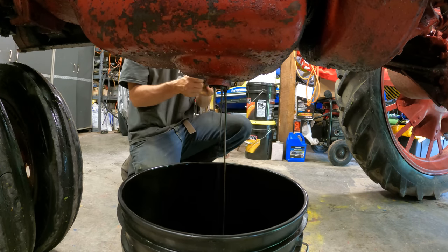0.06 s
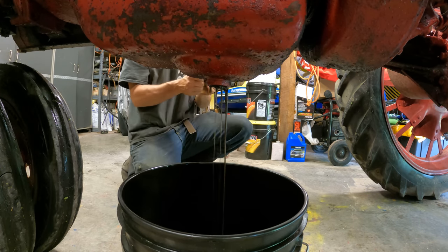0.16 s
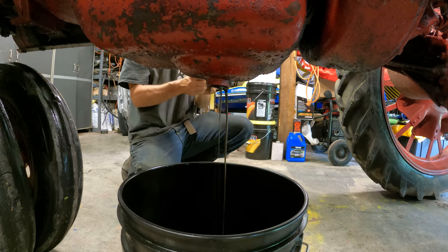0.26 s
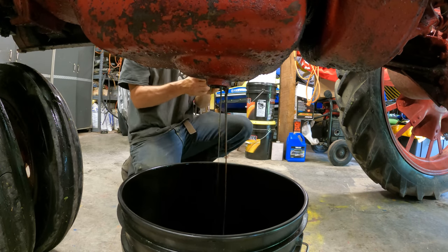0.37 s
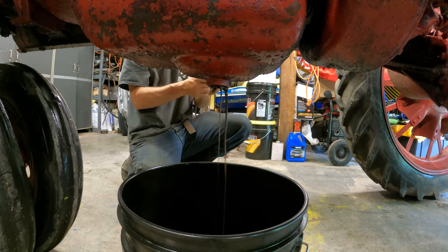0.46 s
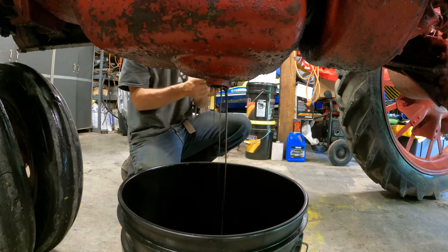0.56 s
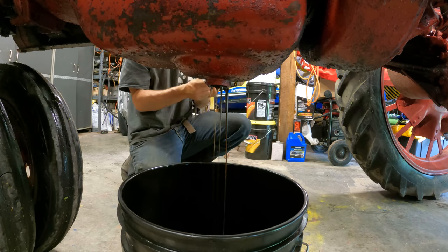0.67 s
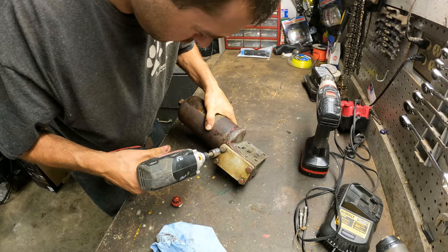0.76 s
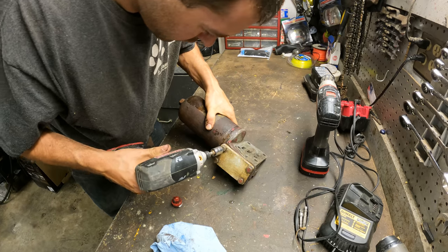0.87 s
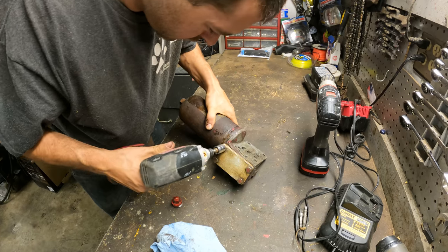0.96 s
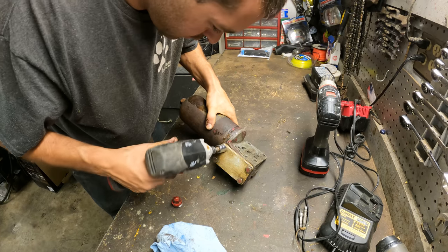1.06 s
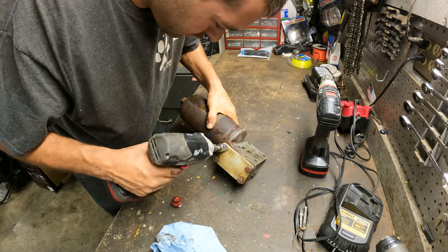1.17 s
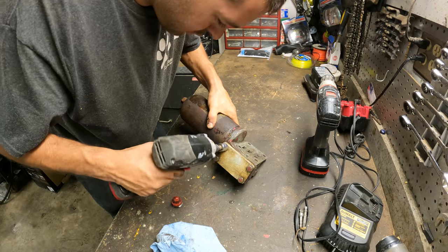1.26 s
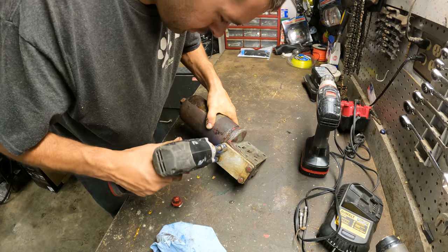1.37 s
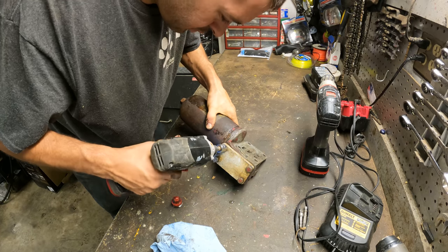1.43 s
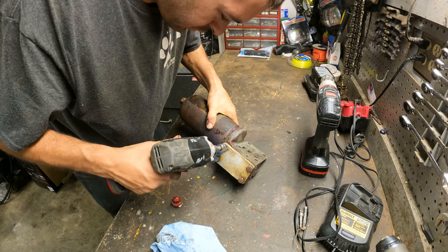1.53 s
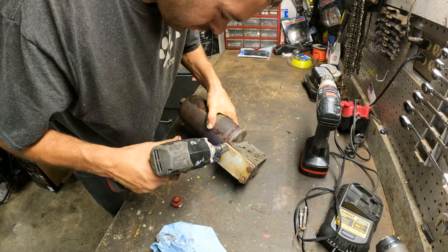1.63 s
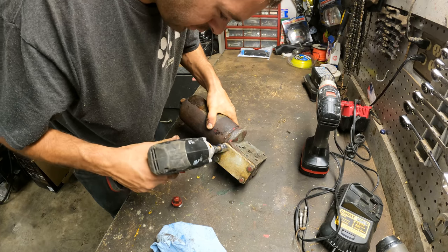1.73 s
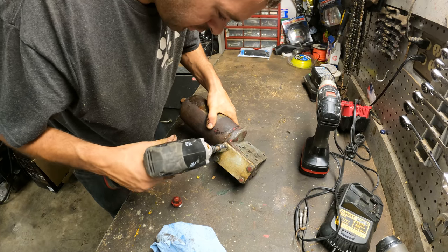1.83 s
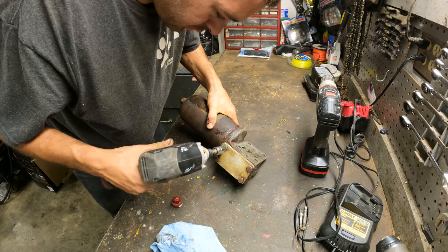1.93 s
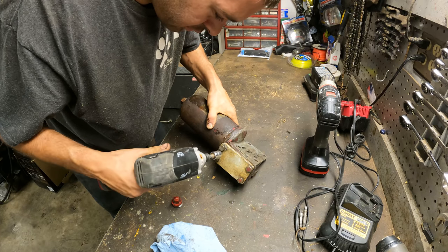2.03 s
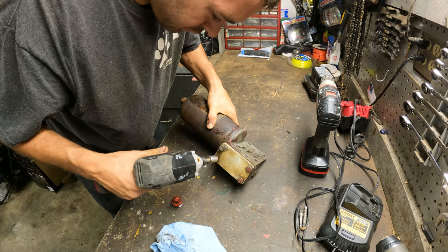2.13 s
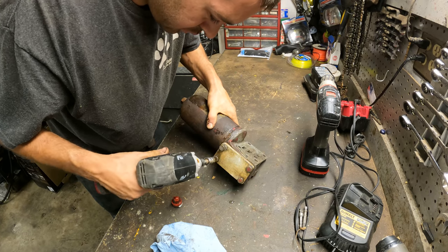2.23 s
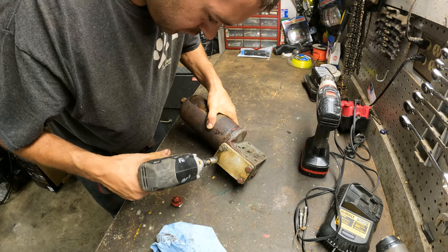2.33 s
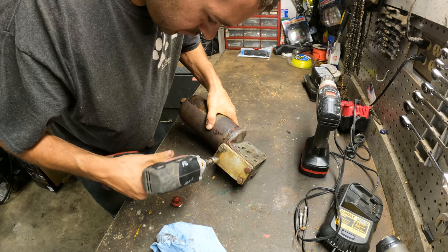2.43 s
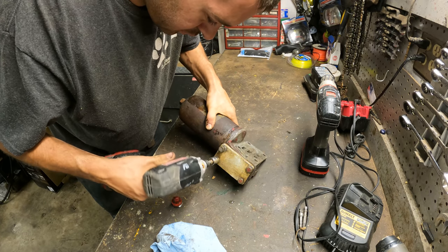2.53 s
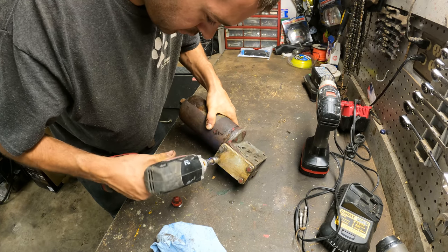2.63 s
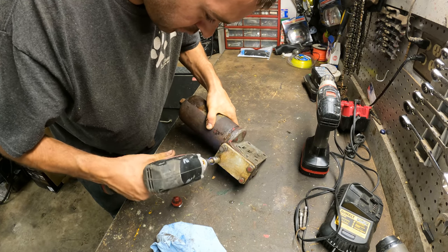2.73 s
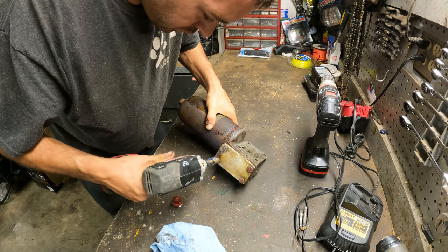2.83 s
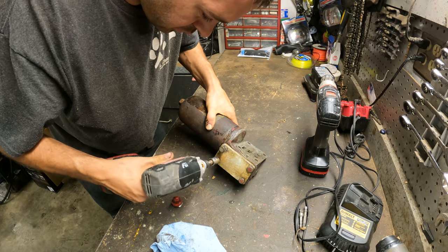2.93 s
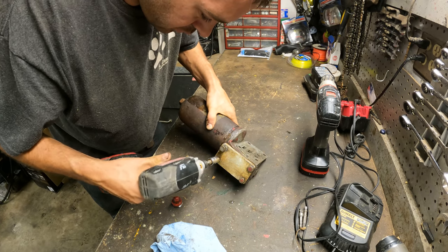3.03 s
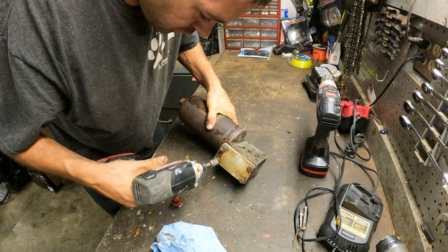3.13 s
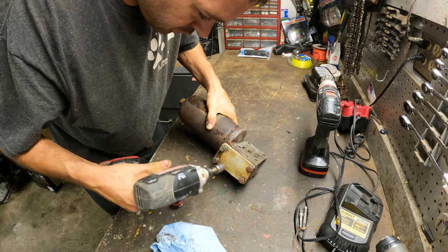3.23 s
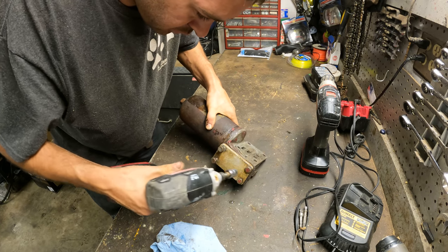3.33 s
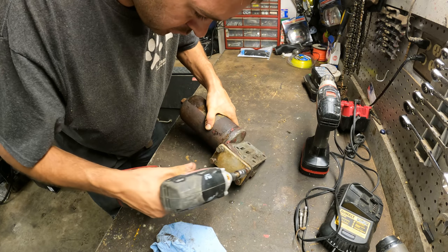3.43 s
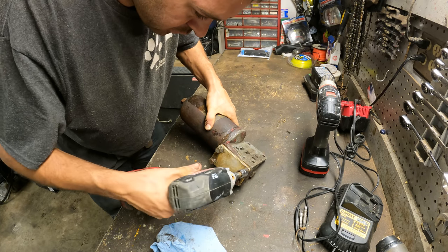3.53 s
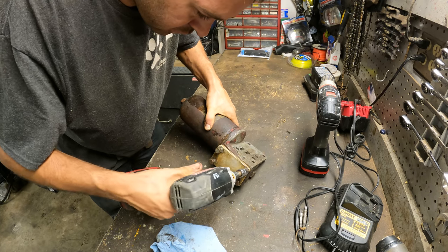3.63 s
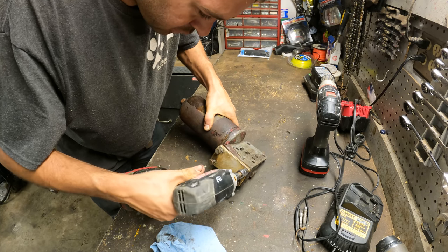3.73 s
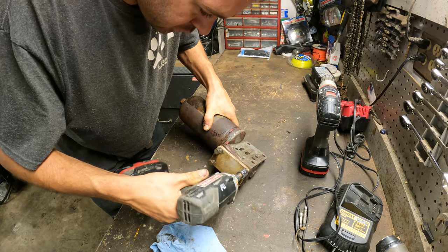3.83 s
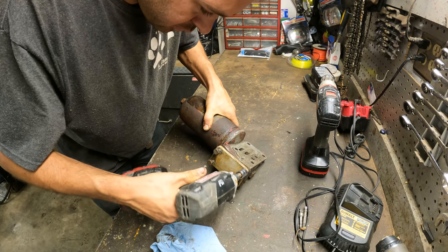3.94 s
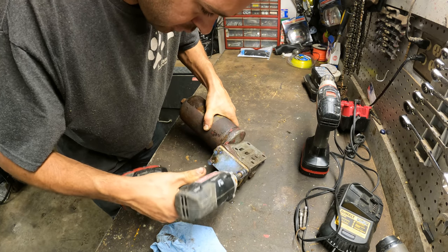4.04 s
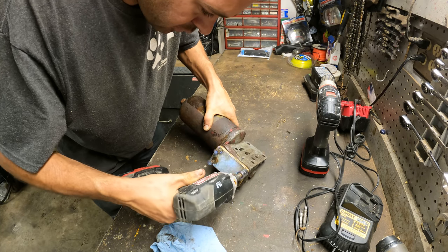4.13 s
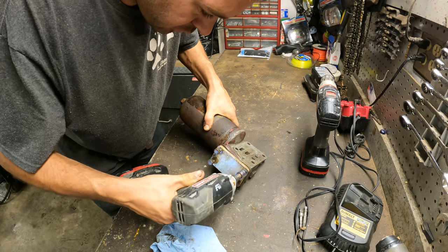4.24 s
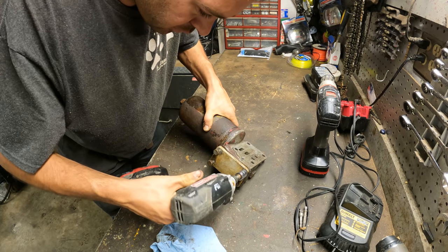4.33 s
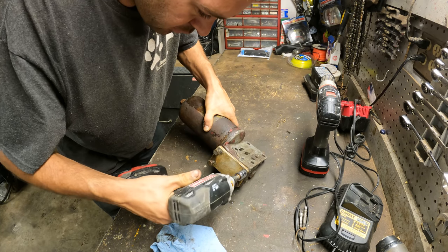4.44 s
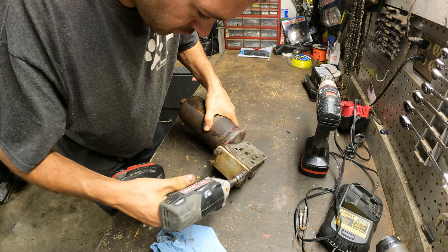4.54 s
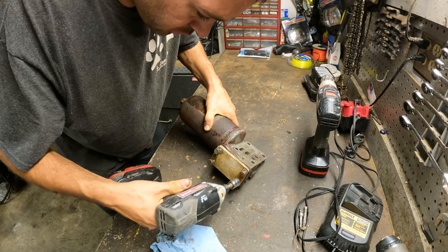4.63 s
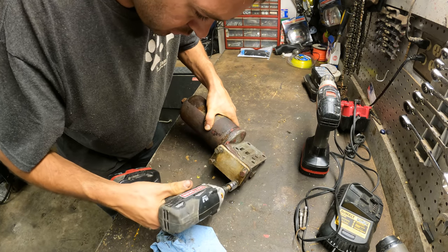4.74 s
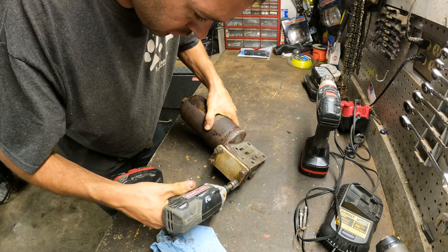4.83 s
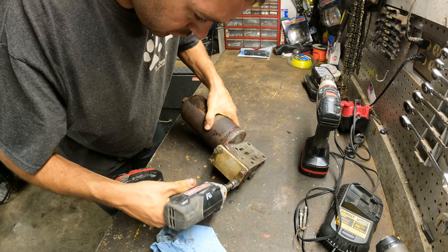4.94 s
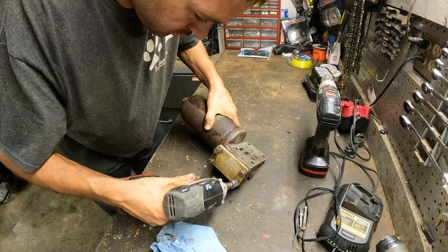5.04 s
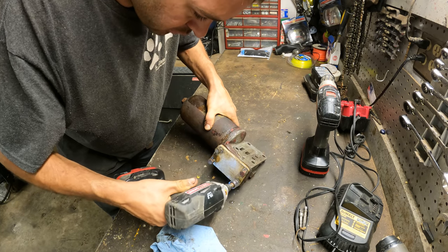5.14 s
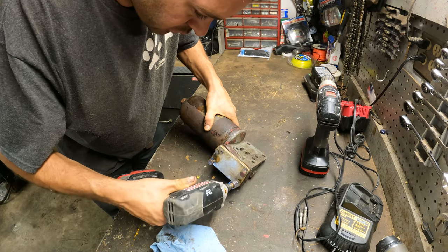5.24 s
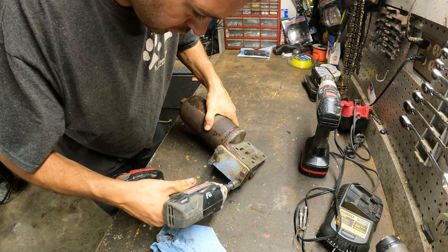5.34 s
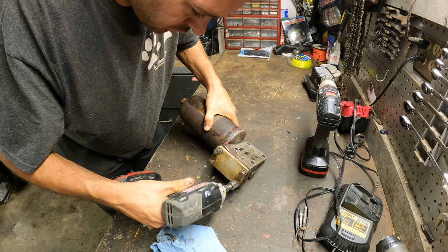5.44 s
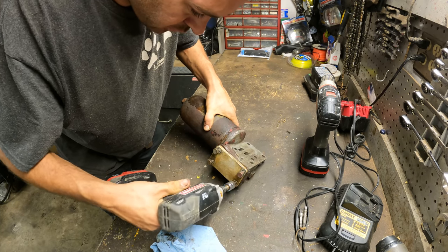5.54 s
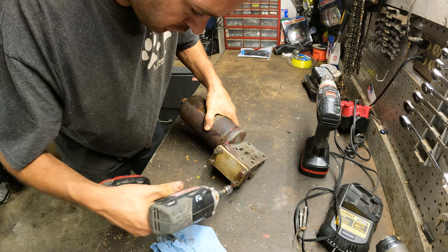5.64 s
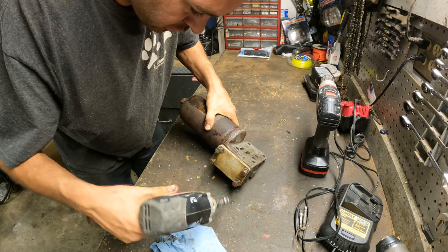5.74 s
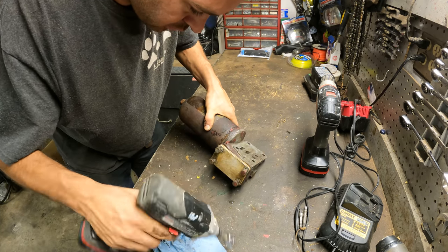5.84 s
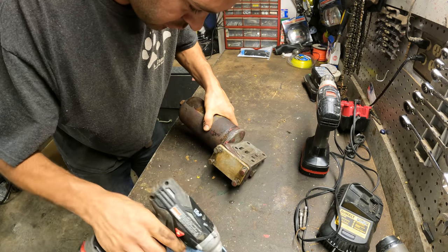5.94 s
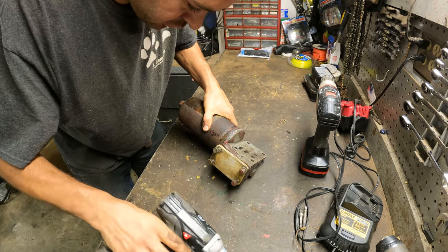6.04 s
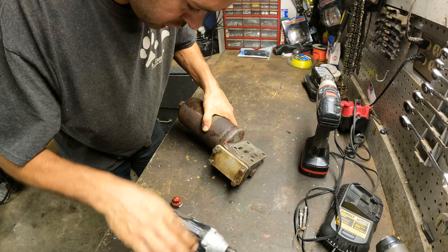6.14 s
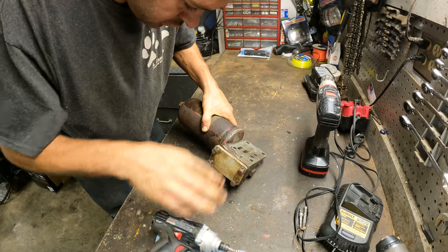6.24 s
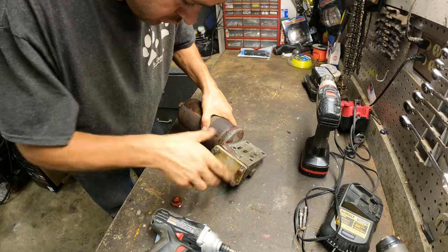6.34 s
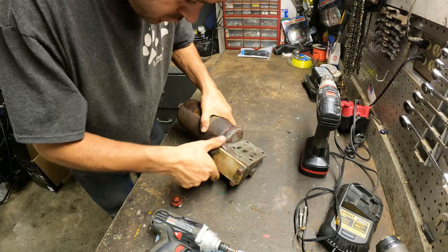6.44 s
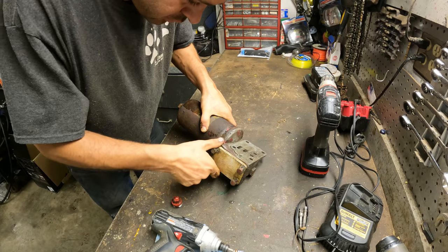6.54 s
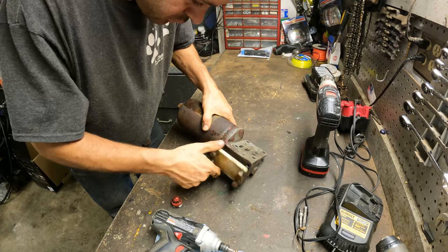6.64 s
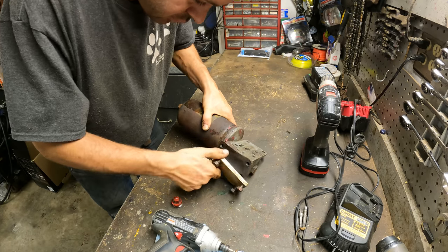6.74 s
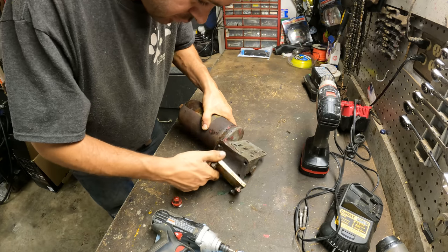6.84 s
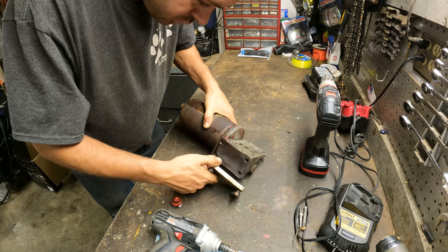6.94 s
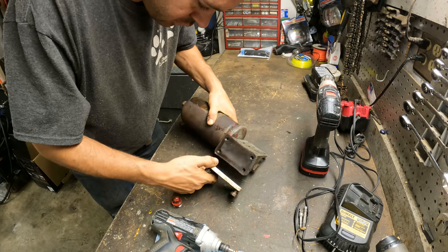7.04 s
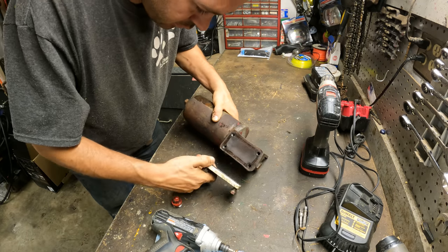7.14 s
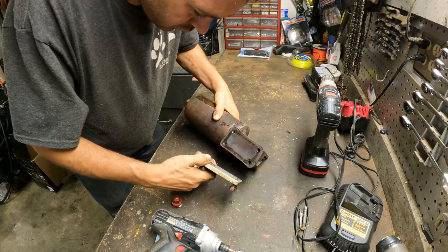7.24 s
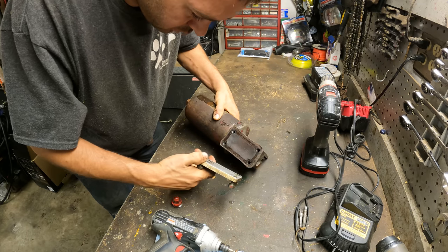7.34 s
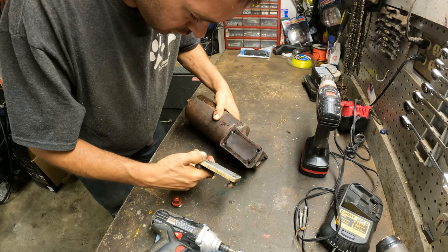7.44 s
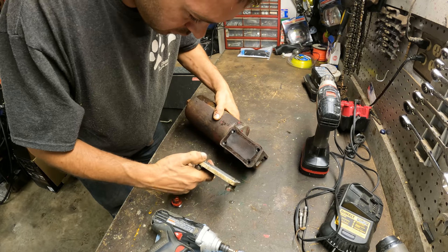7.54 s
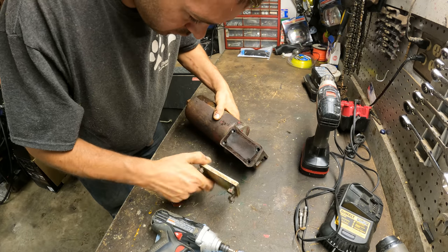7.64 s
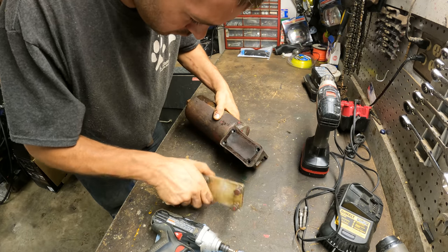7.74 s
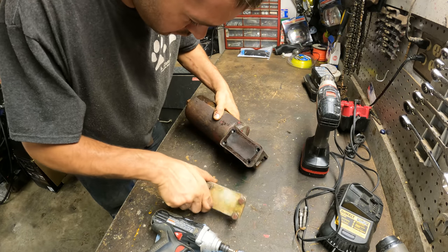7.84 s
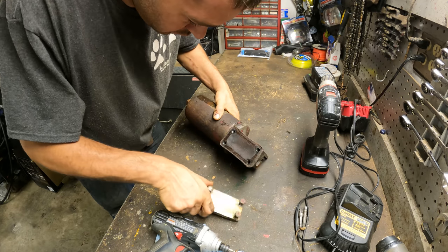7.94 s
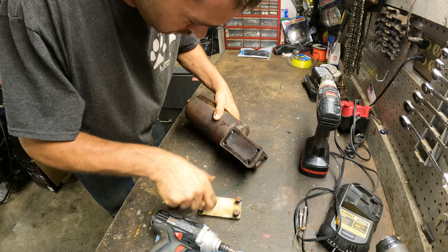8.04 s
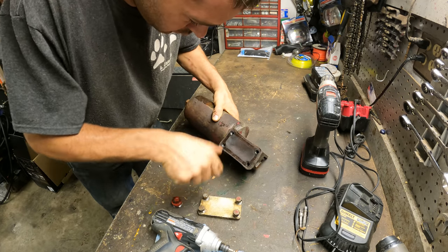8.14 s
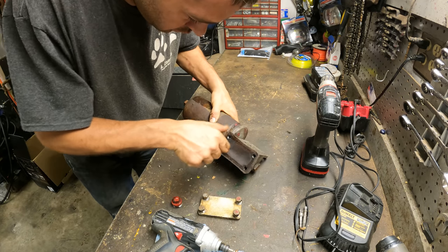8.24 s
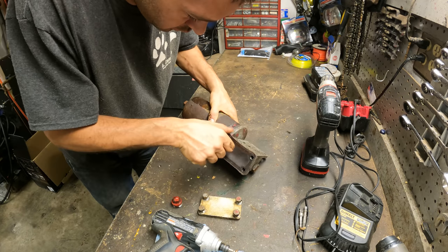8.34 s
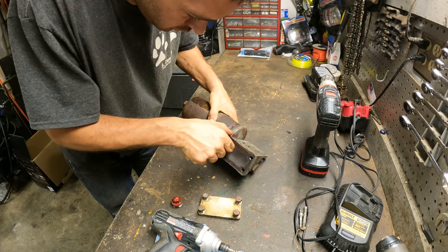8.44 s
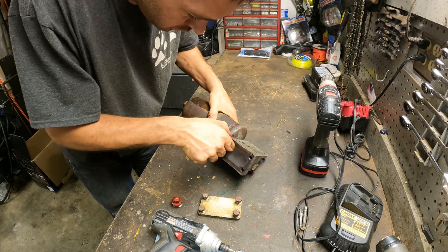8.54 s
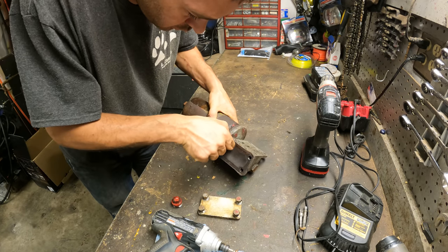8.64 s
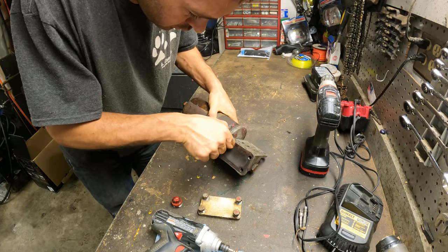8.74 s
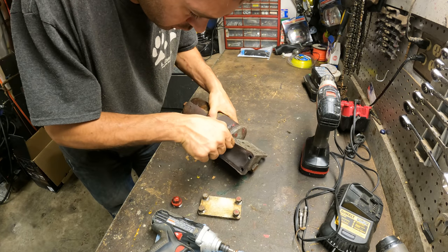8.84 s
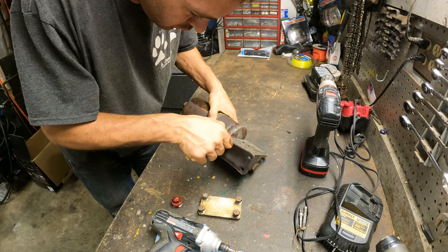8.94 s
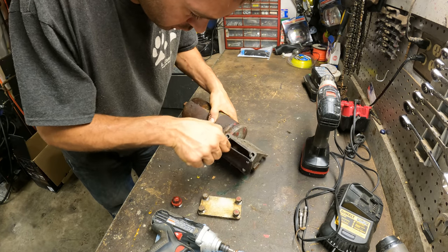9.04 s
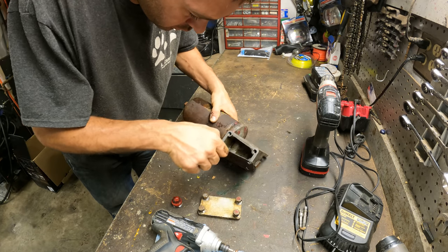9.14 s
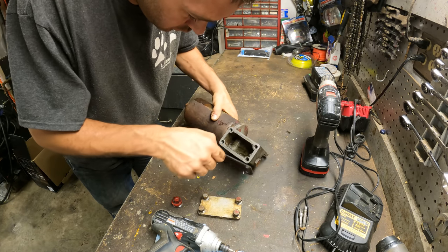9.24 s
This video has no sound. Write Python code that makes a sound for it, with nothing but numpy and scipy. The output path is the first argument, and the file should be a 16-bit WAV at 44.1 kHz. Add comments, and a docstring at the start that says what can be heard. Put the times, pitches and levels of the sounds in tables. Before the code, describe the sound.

Close-up in a small reverberant garage: first a wet, bubbly oil stream with small spits in a bucket, ended by a hard cut. Then an impact driver undoes four bolts in an iron housing on a bench, whirring and rasping over low drumming, with metallic clacks between runs. Heavy thuds follow as it is laid down; a loose cover plate rings and clatters onto the bench, leaving faint handling taps.

```python
"""An impact driver spins four bolts out of an iron housing: whining, rasping gears, two blows, a shaking run, a ratchet.
Between bolts the socket rattles, and knocks sound as sets of dying tones with bursts of noise.
The driver is put down; a steel cover plate clinks free and is dropped on the bench.
Before all this, a thin stream of used oil gurgles into a bucket, made of many ringing bubbles and spits;
it gives way abruptly to the garage workbench. Echoes and soft air noise lie around the sounds."""
import sys
import numpy as np
from scipy import signal
from scipy.fft import rfft, irfft, next_fast_len
from scipy.io import wavfile
from scipy.ndimage import uniform_filter1d

SR = 44100
rng = np.random.default_rng(int(sys.argv[2]) if len(sys.argv) > 2 else 0)


def to_wav(sig):
    """Store sig (one row per channel, or 1-D mono) as 16-bit WAV at the path in sys.argv[1].

    Samples outside -1..1 are clipped; the rate is SR.
    """
    pcm = np.clip(np.atleast_2d(sig), -1, 1) * 32767
    pcm = np.round(pcm).astype(np.int16)
    wavfile.write(sys.argv[1], SR, pcm.T)  # frames by channels


N = 409688
TIME = np.arange(N) / SR  # seconds from the beginning
AGE = TIME[:SR]  # seconds since a single sound began, up to one second

# In these tables t60_s is the time a tone or echo takes to die away by 60 dB.
# The four bolts: first_blow_s, second_blow_s, last_click_s, coast_s, top_tooth_hz,
# gear_level_db, shaking_level_db, ratchet_level_db
BOLT_RUNS = [(1.4274, 1.4485, 1.914, 0.23, 1487, -21, -15, -7),
             (2.7211, 2.748, 3.152, .15, 1535, -21.5, -17, -10.5),
             (4.1479, 4.17, 4.5375, .12, 1539, -22, -18.5, -11),
             (5.2078, 5.231, 5.594, .13, 1535, -21.5, -21.5, -7)]
# Whine of the gear teeth: multiple of the tooth rate, level_db
WHINE_TONES = [(1, -4), (2, 0), (3, -10), (4, -11), (5, -16), (6, -23)]
# Tone colour of the gears: pitch_hz, level_db
GEAR_COLOUR = [(180, -49.5), (300, -17), (384, -8.5), (439, -20), (543, -9), (1000, -16), (1460, -4.5),
               (2280, -8.5), (2930, -5), (3280, -9.5), (3570, -6), (5130, -10), (7250, -16.5), (12700, -31),
               (15500, -42.5)]
# Resonances of the driver's casing: pitch_hz, width_hz, lift_db
CASING_PEAKS = [(1520, 250, 5.5), (2840, 700, 4), (3570, 190, 4), (6000, 500, 3), (7260, 400, 2.5)]
# The socket rattles on the driver and scrapes onto a bolt head: loudest_s, level_db
SOCKET_RATTLES = [(.8, -43.5), (.904, -46), (1.34, -49), (2.402, -41), (2.502, -33.5), (2.555, -32),
                  (3.645, -30), (3.976, -19.5), (4.945, -32), (5.028, -33.5), (6.062, -41.5), (6.137, -27)]
# Socket, housing and driver knock on the bench:
# start_s, weight_db, hardness (0-1), crack_db (metal on metal), flatness of the landing (0-1)
BENCH_KNOCKS = [(0.7694, -42, 0.37, -54, 0.97), (0.8356, -35, 0.08, -51.5, 0.9),
                (1.058, -22.5, 0.09, -8.5, 0.06), (1.1093, -31, .4, -28, 0.46),
                (1.1517, -29.5, .4, -13, 0.17), (1.1839, -16.5, 0.25, -7.5, 0.51),
                (1.4005, -51, 0.8, -12.5, 0.16), (2.4983, -39, 0.44, -18, 0.5),
                (2.5404, -25, 0.27, -19.5, 0.45), (2.551, -24.5, 0.28, -22, 0.73),
                (3.6437, -31, 0.43, -22, 0.35), (3.7076, -32, 0.41, -41, 0.48),
                (3.9708, -15, 0.64, -7.5, 0.57), (4.9321, -45, 0, -22, 0.5),
                (4.9475, -31, 0.41, -23.5, 0.3), (5.023, -25, 0.2, -17, 0.76),
                (6.0602, -57.5, 0.3, -29.5, 0.64), (6.1398, -21.5, 0.74, -5.5, 0.51),
                (6.1506, -21.5, 0.64, -14, 0.78), (6.228, -10.5, 0.78, -8, 0.56),
                (6.2531, -17, 0.75, -6.5, .65), (6.3177, -14, 0.58, -19, 0.38),
                (6.3361, -16.5, 0.82, -13.5, 0.53), (6.434, -29.5, 0.57, -52, 0.46),
                (6.5784, -38.5, 0, -93.5, 0.26), (6.701, -50, .56, -55.5, 0.95),
                (6.8025, -70.5, 0.06, -49, 0), (7.2352, -20, .7, -50, 0.25),
                (7.261, -26.5, 0.56, -45, 0.44), (8.779, -65.5, 0.6, -47.5, 0.7),
                (8.8463, -62, .9, -64, .99), (8.9049, -60.5, 0.63, -44, 0.95),
                (9.0725, -69, 0.47, -55.5, 0.26)]
# The cover plate clinks and drops:
# start_s, weight_db, hardness (0-1), crack_db, flatness (0-1), ring_db
COVER_PLATE_HITS = [(7.0167, -41, 0.7, -36.5, 0.37, -30), (7.857, -68, 0.17, -34, .25, -40.5),
                    (8.0159, -23, 0.86, -17.5, 0.95, -25.5), (8.063, -25, 0.69, -10, 0.87, -28.5),
                    (8.104, -27, .68, -2.5, 0.76, -20.5), (8.1277, -28, 1, -15.5, 0.92, -37.5)]
# Ringing tones of the bench and the things set down on it: pitch_hz, level_db, t60_s
KNOCK_TONES = [(42.9, -12, 0.84), (51, -11.5, 0.92), (95, 0, 0.23), (112.96, -5, 0.38), (136.3, -1.5, 0.15),
               (186, -3, .11), (239, -3, 0.11), (275, -12, 0.12), (407, -6, 0.15), (466, -5.5, 0.1),
               (515, -4, 0.21), (594, -3, .09), (770, -6, 0.025), (933, -6.5, 0.11), (1100, -2, 0.093),
               (1134, -6, 0.095), (1150, -9.5, 0.043)]
# Ringing tones of the iron housing: pitch_hz, level_db, t60_s
HOUSING_TONES = [(1417, -7, .1), (2035, -8, .18), (2445, -16, .15)]
# Ringing tones of the cover plate: pitch_hz, level_db, t60_s
PLATE_TONES = [(2234, -20, .24), (2837, -26, .4), (3472, -17, .2), (4800, -5, .22), (4900, -8, .2),
               (5440, -1, .26), (5520, -4, .22), (5900, -7, .16), (11300, -22, .1), (11900, -20, .11),
               (12150, -21, .1)]
# Crowded tones of the cover plate, heard as noise: pitch_hz, level_db
SHIMMER_COLOUR = [(3800, -17), (4600, -6), (4850, 0), (5150, -8), (5450, 0.5), (5950, -11.5), (6500, -12.5),
                  (8000, -50)]
# Crack of metal on metal: pitch_hz, level_db
CRACK_COLOUR = [(700, -15), (1450, 4.5), (2200, -0.5), (3000, -1.5), (4300, -6), (6000, -13.5), (9000, -40)]
# Bright tick of a contact: pitch_hz, level_db
TICK_COLOUR = [(3000, -13.5), (5200, 0.5), (7000, -3), (9000, -10), (12500, -19.5), (15500, -31.5)]
# Slap of a contact: pitch_hz, level_db
CLACK_COLOUR = [(150, -25), (400, 0.5), (800, -4), (1200, -4), (1800, -12), (4000, -45.5)]
# Single bubbles in the oil: start_s, pitch_hz, level_db
OIL_BUBBLES = [(.04, 1497, -24), (.086, 654, -24.5), (.148, 697, -29.5), (.194, 1520, -26.5),
               (.237, 1860, -19), (.279, 624, -25.5), (.344, 774, -31), (.352, 1120, -18),
               (.378, 1850, -19), (.457, 2036, -25), (.511, 747, -31.5), (.572, 1393, -19),
               (.623, 1090, -22.5), (.697, 2900, -18)]
# Single spits of bursting oil film: start_s, level_db
OIL_SPITS = [(.225, -26), (0.381, -23), (.412, -15), (0.458, -18), (0.5033, -22.5), (0.573, -18),
             (0.639, -24), (0.698, -30)]
# Tone colour of the spits and the fizz: pitch_hz, level_db
SPIT_TONE_COLOUR = [(900, -47), (1800, -5), (3300, 7), (6000, -4), (9000, -11), (12500, -20.5),
                    (15000, -44)]
# Ringing of the air in the bucket: pitch_hz, level_db, t60_s
BUCKET_TONES = [(376.5, 4.5, 0.24), (650, 3.5, 0.12), (830, 12, 0.067), (1190, -12.5, 0.11),
                (1552, -18, .06), (1926, -12.5, 0.1), (3000, -31, .06)]
# Steady noise of the pouring: pitch_hz, level_db
POUR_COLOUR = [(25, -8), (45, 5), (90, -7.5), (200, -2), (370, 4.5), (480, -11), (750, 3), (1500, -12),
               (3000, -15), (7000, -13.5), (13000, -34.5)]
# How fast the garage echoes die: pitch_hz, t60_s
GARAGE_DECAY = [(100, 0.47), (500, 0.38), (1500, 0.41), (4000, 0.43), (8000, 0.26), (15000, 0.85)]
# Echoes that differ between left and right (the side part): pitch_hz, level_db
ECHO_WIDTH = [(60, -34.5), (200, -31), (700, -19.5), (2000, -26.5), (5000, -19), (9000, -13.5), (12500, -3)]
# Soft air noise in the garage: pitch_hz, level_db
AIR_COLOUR = [(15, -26.5), (25, 6), (44, -2.5), (103, -24), (150, -3.5), (257, -20), (404, -21.5),
              (790, -38.5), (1210, -26.5), (1540, -32.5), (2430, -38), (3180, -37), (3730, -40.5),
              (7480, -44.5), (15000, -68)]

LEAD_S = .038  # the trigger is pulled this long before the first blow
SLOW_HZ, SPIN_UP_S = 654, 0.06  # tooth rate at a crawl; time to gather speed
# The gear noise swells, grows louder with speed and sinks after the last click.
GEAR_RISE_S, GEAR_SPEED_DB, GEAR_STOP_S = .03, 26.5, .04
BLOW_DB, BLOW_TICK_DB = -11, -5.5
# The last gap between clicks; each gap is longer and each click softer than the one before.
RATCHET_GAP_S, RATCHET_SLOWING, RATCHET_FADE_DB = .0232, 1.04, 4.5
# The bolt shakes the bench until it is out of its thread.
SHAKE_RISE_S, SHAKE_HOLD_S, SHAKE_FADE_DB_PER_S = 0.011, 0.29, 150
WOBBLE_HZ, WOBBLE_DB, WOBBLE_PEAK_S = 4.8, 3, .06  # the shaking comes in two swells
RATTLE_RISE_S, RATTLE_FALL_S = .009, .018
HARD_TILT_DB = 23  # a hard contact trades low thud for higher boom
CLACK_DB, CLACK_FLAT_DB = -21.5, 25  # against the mean of boom and crack; a flat landing slaps
TICK_DB, TICK_DULLING_DB = -11, 20  # against the crack; flat landings tick less
CUT_S = 0.768  # the oil gives way to the workbench here
BUBBLE_LIFE_S, LIFE_SLOPE = .0046, 0.46  # life at 1 kHz; thick oil damps smaller bubbles sooner
# A chain of low glugs under the stream climbs by GLUG_RISE octaves a second.
GLUG_HZ, GLUG_RISE, GLUG_GAP_S, GLUG_DB = 699, .4, .03, -35
SPIT_GAP_S, SPIT_DB = .05, -31  # further spits at irregular moments
POUR_DB, AIR_DB = -51, -59.5
EDGE_HZ = 15700  # upper limit of the whole sound


def amp(db):
    """Turn decibels into a plain multiplier."""
    return 10 ** (np.asarray(db) / 20)


def unit(x):
    """Scale a sound to an average (rms) strength of 1."""
    return x / np.sqrt(np.mean(x ** 2) + 1e-20)


def read(points, hz):
    """Read a curve between its points, on a logarithmic pitch scale."""
    f, value = np.transpose(points)
    return np.interp(np.log(hz + 1), np.log(f + 1), value)


def add(mix, s, sound):
    """Mix a sound in at s seconds, cutting off what runs past the end."""
    part = mix[max(round(s * SR), 0):][:len(sound)]
    part += sound[:len(part)]


def noise(points, size, peaks=()):
    """Noise of rms 1 with a smooth spectrum and resonant lifts, falling away above its last point."""
    fast = next_fast_len(size)
    hz = np.fft.rfftfreq(fast, 1 / SR)
    db = read(points, hz)
    for f, width, lift in peaks:
        db = db + lift / (1 + (2 * (hz - f) / width) ** 2)
    skirt = np.maximum(hz / points[-1][0], 1) ** -4
    spectrum = rfft(rng.standard_normal(fast)) * amp(db) * skirt
    return unit(irfft(spectrum, fast)[:size])


def drift(rate_hz):
    """Slow random wandering of rms 1."""
    lowpass = signal.butter(2, rate_hz, fs=SR, output="sos")
    return unit(signal.sosfilt(lowpass, rng.standard_normal(N)))


def ring(modes, scatter_db=0, detune=0):
    """A struck body sounds as dying tones; each point of contact weights them a little differently."""
    out = np.zeros(SR)
    chance = rng.standard_normal((len(modes), 2))
    for k, ((hz, db, t60), (louder, sharper)) in enumerate(zip(modes, chance)):
        fading = amp(db + scatter_db * louder - 60 * AGE / t60)
        tone = np.sin(2 * np.pi * hz * (1 + detune * sharper) * AGE)
        out += fading * tone * (-1) ** k  # every other tone starts downwards
    return out


def burst(colour, fall_s, rattle_db, rattle_s, peaks=(), rise_s=0.0012):
    """A sharp burst of contact noise plus a weaker rattle with its own fading time."""
    t = AGE[:SR // 4]
    rise = 1 - np.exp(-t / rise_s)
    fall = np.exp(-t / fall_s) + amp(rattle_db) * np.exp(-t / rattle_s)
    return noise(colour, len(t), peaks) * rise * fall


def driver(grain_db=1.0, whine_db=-5.0, gears_db=-1.5, rattle_db=-7.0):
    """Gear teeth whine and rasp in the casing; the rasp throbs with each turn of the motor shaft."""
    tooth_hz, gain = motor()
    unsteady = 1 + .003 * drift(90) + .003 * drift(12)
    teeth = np.cumsum(tooth_hz * unsteady) / SR  # running count of teeth passed
    shaft = teeth / 4  # turns of the shaft
    throb = 1 + 0.17 * np.cos(2 * np.pi * shaft)
    partials = np.zeros(N)
    for k, db in WHINE_TONES:
        partials += amp(db + 3.5 * drift(14)) * np.cos(2 * np.pi * k * teeth)
    # uneven teeth repeat each turn: a comb of weaker lines glides with the motor
    comb = np.zeros(N)
    for k in range(5, 20):
        line_db = read(GEAR_COLOUR, k * 380) + 3 * drift(10)
        comb += amp(line_db) * np.cos(2 * np.pi * (k * shaft + rng.random()))
    whine = unit(unit(partials * throb) + .8 * unit(comb))
    whine = whine * (tooth_hz / tooth_hz.max()) ** 3  # the gears sing only near full speed
    rasp = unit(noise(GEAR_COLOUR, N, CASING_PEAKS) * throb * amp(grain_db * drift(69)))
    loose = np.zeros(N)  # loudness of the rattling socket
    for s, db in SOCKET_RATTLES:
        distance = np.maximum((s - TIME) / RATTLE_RISE_S, (TIME - s) / RATTLE_FALL_S)
        loose += amp(db) * np.exp(-distance.clip(max=30))
    running = gain * (amp(gears_db) * rasp + amp(whine_db) * whine)
    return running + amp(rattle_db) * loose * rasp


def motor(wind_up_db=-21, wind_up_s=0.012):
    """Each trigger pull winds up the hammer spring and spins the gears: tooth rate and loudness."""
    tooth_hz = np.zeros(N) + SLOW_HZ
    gain = np.zeros(N)
    for first, _, stop, coast_s, top_hz, db, _, _ in BOLT_RUNS:
        start = first - LEAD_S
        past_stop = start + AGE - stop
        coasting = np.clip(1 + past_stop / coast_s, 0, 1) ** 1.6
        speed = (1 - np.exp(-AGE / SPIN_UP_S)) * (1 - coasting)  # 0 = crawl, 1 = full speed
        running = np.minimum(AGE / GEAR_RISE_S, 1) * np.exp(-np.maximum(past_stop, 0) / GEAR_STOP_S)
        gears = amp(db - GEAR_SPEED_DB * (1 - speed)) * running
        wind_up = amp(wind_up_db) * np.exp(-abs(AGE - LEAD_S) / wind_up_s)
        add(tooth_hz, start, (top_hz - SLOW_HZ) * speed)
        add(gain, start, gears + wind_up)
    return tooth_hz, gain


def hammer(count=6, click_db=-8.5, click_tick_db=-20):
    """Two blows break each bolt loose; the hammer ratchets ever more slowly as the motor brakes."""
    out = np.zeros(N)
    for first, second, stop, *_, ratchet_db in BOLT_RUNS:
        for s in (first, second):
            add(out, s, strike(BLOW_DB, BLOW_TICK_DB))
        s = stop
        for k in range(count):  # counted back from the last click
            db = ratchet_db - RATCHET_FADE_DB * .5 ** k
            add(out, s, strike(db + click_db, db + click_tick_db))
            s -= RATCHET_GAP_S / RATCHET_SLOWING ** k
    return out


def strike(body_db, tick_db):
    """Steel strikes steel inside the casing: a body of noise and a bright tick."""
    body = burst(GEAR_COLOUR, fall_s=.004, rattle_db=-14.5, rattle_s=0.032, peaks=CASING_PEAKS)
    tick = burst(TICK_COLOUR, fall_s=0.0005, rattle_db=-16.0, rattle_s=0.017)
    return amp(body_db) * body + amp(tick_db) * tick


def shaking(sag_db_per_s=12):
    """The spinning bolt jostles the housing, which drums on the bench and excites mostly the low tones."""
    swells_db = WOBBLE_DB * (np.cos(2 * np.pi * WOBBLE_HZ * (AGE - WOBBLE_PEAK_S)) - .5)
    fade_db = sag_db_per_s * AGE + SHAKE_FADE_DB_PER_S * np.maximum(AGE - SHAKE_HOLD_S, 0)
    shape = np.minimum(AGE / SHAKE_RISE_S, 1) * amp(swells_db - fade_db)
    gain = np.zeros(N)
    for first, *_, db, _ in BOLT_RUNS:
        add(gain, first, amp(db) * shape)
    push = noise([(20, 0.5), (45, 7.0), (100, 3.5), (200, 2.0), (320, -12), (700, -24), (2000, -46.5)], N)
    drumming = signal.oaconvolve(push, ring(KNOCK_TONES))[:N]
    return gain * unit(drumming)


def handling():
    """Knocks on the bench; the loose cover plate adds its own ring and shimmer."""
    out = np.zeros(N)
    for s, *blow in BENCH_KNOCKS:
        add(out, s, knock(*blow))
    for s, *blow, flatness, ring_db in COVER_PLATE_HITS:
        plate = amp(ring_db - 13.5) * ring(PLATE_TONES, scatter_db=2, detune=.004)
        shimmer = burst(SHIMMER_COLOUR, fall_s=.005, rattle_db=-12.0, rattle_s=.03)
        add(out, s, knock(*blow, flatness) + plate)
        add(out, s, amp(ring_db - 1.5 + 4.4 * flatness) * shimmer)
    return out


def knock(weight_db, hardness, crack_db, flatness, push_s=0.0012):
    """A harder contact favours the higher ringing tones; metal on metal adds a crack and a tick."""
    tilt_db = HARD_TILT_DB * (hardness - .5)
    thud_db, boom_db = weight_db - tilt_db, weight_db + tilt_db
    clack_db = (boom_db + crack_db) / 2 + CLACK_DB + CLACK_FLAT_DB * flatness
    tick_db = crack_db + TICK_DB - TICK_DULLING_DB * flatness
    # how hard each pitch range is pushed: pitch_hz, level_db
    force = [(45, weight_db - 2), (100, thud_db + 2.5), (150, boom_db + 3.5), (260, boom_db),
             (390, clack_db - 7)]
    pushed = [(hz, db + read(force, hz), t60) for hz, db, t60 in KNOCK_TONES]
    out = ring(pushed, scatter_db=3, detune=0.015) * (1 - np.exp(-AGE / push_s))
    out += amp(boom_db - 28.5) * ring(HOUSING_TONES, detune=.002)  # the housing on the bench rings along
    boom_colour = [(60, -20.0), (150, 4), (300, -4.5), (450, -8.0), (800, -26.5), (2000, -54.0)]
    boom = burst(boom_colour, fall_s=0.0054, rattle_db=-8.5, rattle_s=0.046)
    clack = burst(CLACK_COLOUR, fall_s=0.0031, rattle_db=-9.0, rattle_s=0.027)
    crack = burst(CRACK_COLOUR, fall_s=0.0049, rattle_db=-12.0, rattle_s=0.027)
    tick = burst(TICK_COLOUR, fall_s=0.0042, rattle_db=-16.0, rattle_s=0.015)
    add(out, 0, amp(boom_db - 8.0) * boom)
    add(out, 0, amp(clack_db) * clack)
    add(out, 0, amp(crack_db - 9.5) * crack)
    add(out, 0, amp(tick_db) * tick)
    return out


def oil(small_per_s=330, small_db=-41, spread_db=4, fizz_db=-18, clump_db=5, glug_spread=0.15,
        chirp_gap_s=.033, chirp_hz=2100, chirp_db=-30, scatter_db=3):
    """The stream drags air under: bubbles large and small, spits and fizz, all inside the bucket."""
    pool = np.zeros(N)
    for s, hz, db in OIL_BUBBLES:
        add(pool, s, gurgle(hz, db))
    for s, (pitch, size) in zip(scattered(GLUG_GAP_S), rng.standard_normal((200, 2))):
        hz = GLUG_HZ * 2 ** (GLUG_RISE * s + glug_spread * pitch)
        add(pool, s, gurgle(hz, GLUG_DB + scatter_db * size))
    for s, (pitch, size) in zip(scattered(chirp_gap_s), rng.standard_normal((200, 2))):  # middling bubbles
        add(pool, s, gurgle(chirp_hz * 2 ** (.6 * pitch), chirp_db + scatter_db * size))
    for s, pitch, size, cycles in rng.random((int(small_per_s * CUT_S), 4)):
        hz = 800 * 10 ** pitch
        life = (0.82 + 4 * cycles) / hz  # thick oil damps small bubbles within a few cycles
        db = small_db - spread_db * np.log(size + 0.049) - 6 * pitch
        add(pool, s * CUT_S, amp(db) * bubble(hz, life))
    more_spits = [(s, SPIT_DB + scatter_db * rng.standard_normal()) for s in scattered(SPIT_GAP_S)]
    for s, db in OIL_SPITS + more_spits:
        spit = burst(SPIT_TONE_COLOUR, fall_s=0.0047, rattle_db=-22, rattle_s=0.0045)
        add(pool, s, amp(db - 3) * spit)
    # froth crackles where the surface is churned
    churn = np.sqrt(abs(uniform_filter1d(pool ** 2, size=300)))
    fizz = unit(noise(SPIT_TONE_COLOUR, N) * amp(clump_db * drift(300)))
    pool += amp(fizz_db) * churn * fizz
    hollow = ring(BUCKET_TONES)
    hollow = hollow / np.linalg.norm(hollow)
    pool = pool + amp(-21.5) * signal.oaconvolve(pool, hollow)[:N]
    return pool + amp(POUR_DB) * noise(POUR_COLOUR, N) * amp(2.7 * drift(50))


def gurgle(hz, db, pinch_s=.0034, pinch_db=-8):
    """A large bubble rings; a second, weaker one pinches off it a moment later."""
    life = BUBBLE_LIFE_S * (1000 / hz) ** LIFE_SLOPE
    out = bubble(hz, life)
    add(out, pinch_s, amp(pinch_db) * bubble(hz * rng.uniform(0.77, 1.4), life))
    return amp(db - 3) * out


def bubble(hz, life, rise=0.025, wobble=0.062):
    """A bubble swells, rings and climbs unsteadily in pitch as the stream jostles it."""
    u = AGE[:SR // 10] / life  # age counted in lifetimes
    jostle = np.interp(u, np.arange(40) / 2, rng.standard_normal(40))
    pitch_hz = hz * (1 + rise * np.minimum(u, 6) + wobble * jostle)
    return u * np.exp(1 - u) * np.sin(2 * np.pi * np.cumsum(pitch_hz) / SR)


def scattered(gap_s):
    """Irregular moments while the oil pours, on average gap_s apart."""
    moments = gap_s * (np.arange(200) + .5 + .7 * rng.standard_normal(200))
    return moments[(moments > 0) & (moments < CUT_S)]


def garage(x, wet_db):
    """Sparse echoes, each band dying at its own speed; early ones differ most between left and right."""
    sparse = rng.random((2, SR)) < .1
    taps = rng.standard_normal((2, SR)) * sparse * np.clip((AGE - .003) / 0.0053, 0, 1)
    hz, t, z = signal.stft(taps, SR, nperseg=256)  # split into bands; row 0 is middle, row 1 is side
    z = z * amp(-60 * t / read(GARAGE_DECAY, hz)[:, None])
    z[1] *= np.exp(-t / .03)
    z /= np.linalg.norm(signal.istft(z, SR, nperseg=256)[1], axis=1)[:, None, None]
    z[0] *= amp(wet_db)
    z[1] *= amp(read(ECHO_WIDTH, hz))[:, None]
    echoes = signal.istft(z, SR, nperseg=256)[1]
    middle, side = signal.oaconvolve(x[None], echoes, axes=1)[:, :N]
    return np.array([x + middle + side, x + middle - side])


def garage_air():
    """Soft steady noise of the air, with two gentle resonant lifts."""
    return amp(AIR_DB) * noise(AIR_COLOUR, N, [(1160, 100, 1.1), (140, 47, 3.7)])


def scene():
    """The oil pours until CUT_S, then the workbench takes over within a millisecond."""
    pouring = np.clip((CUT_S - TIME) * 1000, 0, 1)
    bench = garage(driver() + hammer(), wet_db=-16.5)
    bench = bench + garage(handling() + shaking(), wet_db=-11.0)
    bench = bench + garage(garage_air(), wet_db=-5)
    return pouring * garage(oil(), wet_db=-11.5) + (1 - pouring) * bench


def record(dry):
    """Peaks are rounded off; then everything above EDGE_HZ is filtered away."""
    lowpass = signal.firwin(511, EDGE_HZ, window=("kaiser", 9), fs=SR)
    return signal.oaconvolve(np.tanh(dry), lowpass[None], "same")


dry = scene()
out = record(dry)
to_wav(out)
```